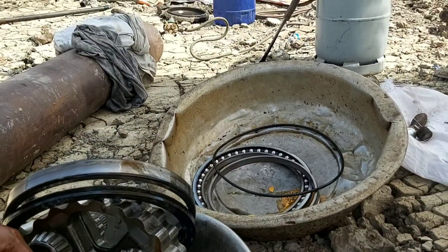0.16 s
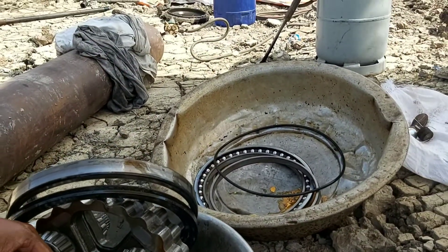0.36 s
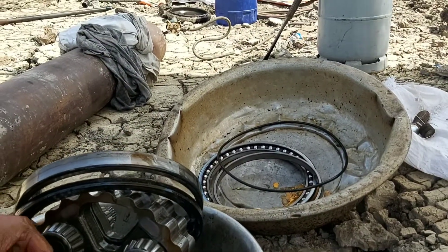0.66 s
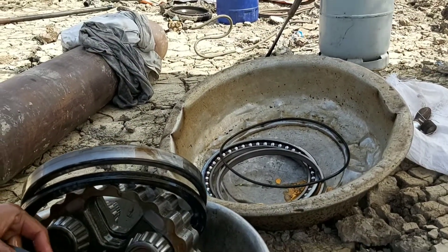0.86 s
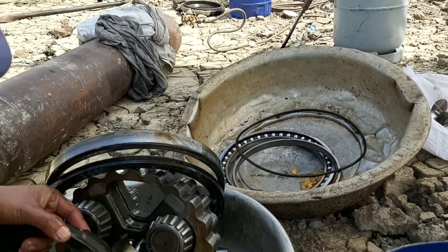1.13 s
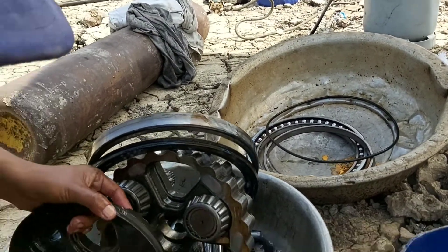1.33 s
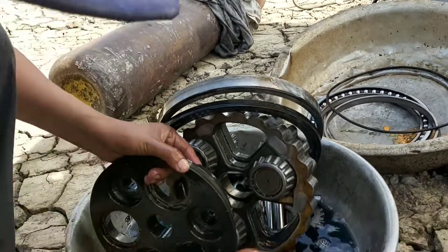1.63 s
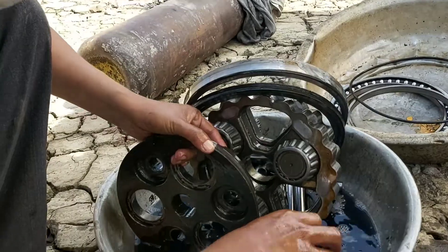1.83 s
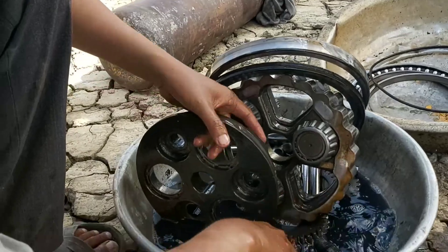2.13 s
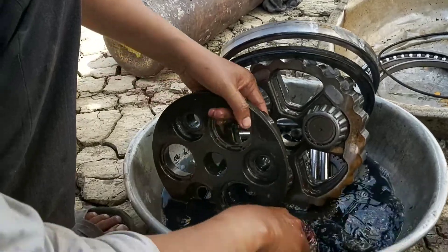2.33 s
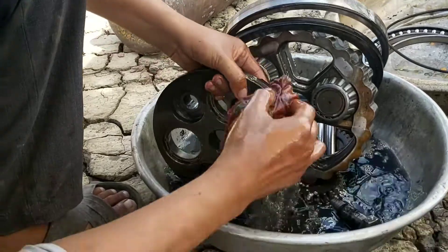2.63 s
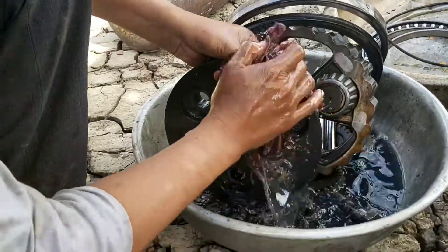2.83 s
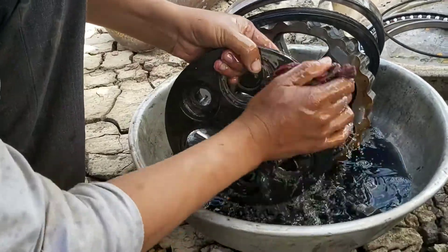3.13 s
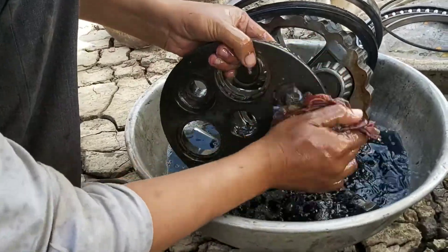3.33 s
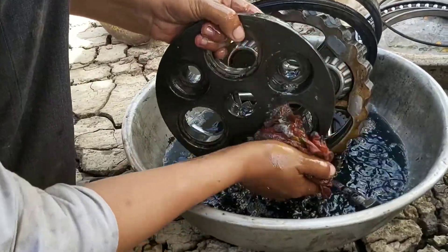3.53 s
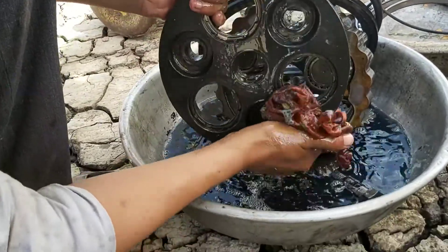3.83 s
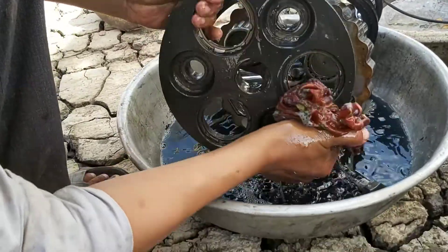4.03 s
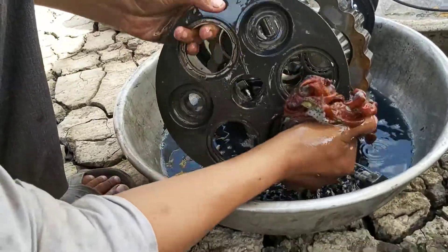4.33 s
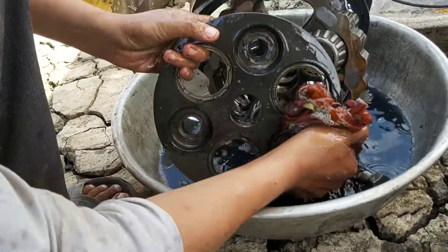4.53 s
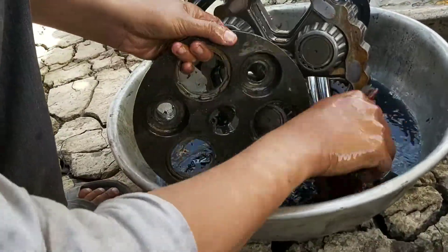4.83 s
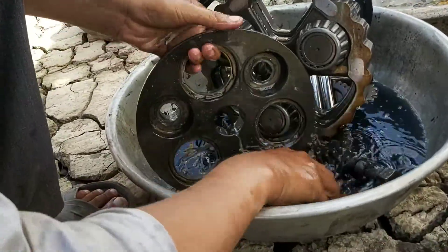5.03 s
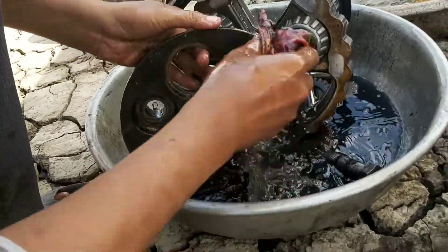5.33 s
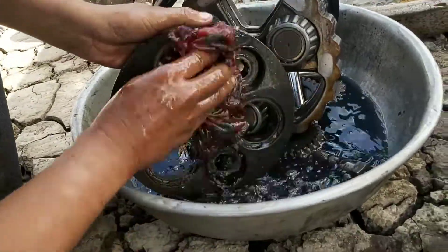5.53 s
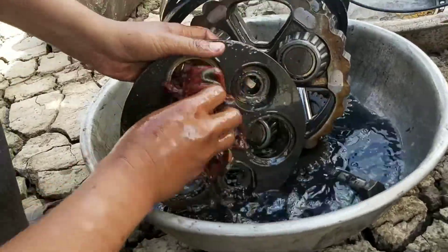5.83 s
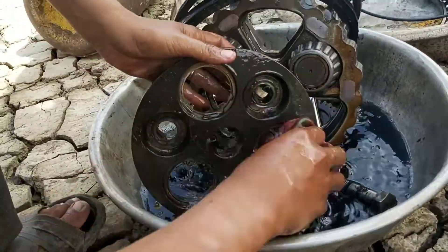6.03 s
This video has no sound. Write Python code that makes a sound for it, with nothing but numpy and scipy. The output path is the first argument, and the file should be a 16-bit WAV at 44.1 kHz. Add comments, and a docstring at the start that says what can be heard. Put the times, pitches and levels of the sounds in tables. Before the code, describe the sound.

A heavy steel gear plate knocks, scrapes and rings in a metal basin while oily liquid sloshes, bubbles and drips, with sharp handling clicks outdoors.

```python
"""A heavy steel gear plate is shifted about in a metal basin of washing oil, outdoors, and wiped with a soaked rag.
It scrapes, knocks and chatters: clusters of tiny contacts and hard blows drive steel modes and the damped basin.
Liquid sloshes, trickles and bubbles: droplet impulses and rising sines, swelling band by band.
A hand-held phone adds sharp case clicks (short modes), low bumps and grip rumble over a quiet yard of soft noise."""
import sys
import numpy as np
from scipy import signal
from scipy.fft import rfft, irfft, next_fast_len
from scipy.io import wavfile
from scipy.ndimage import uniform_filter1d

SR = 44100
rng = np.random.default_rng(int(sys.argv[2]) if len(sys.argv) > 2 else 0)


def generate_wav(signal):
    """Clip the signal to [-1, 1] and save it as 16-bit WAV at the path in sys.argv[1]."""
    frames = np.transpose(np.atleast_2d(signal))
    scaled = np.clip(frames, -1, 1) * 32767
    pcm = np.round(scaled).astype(np.int16)
    wavfile.write(sys.argv[1], SR, pcm)


N = 271656
TIME = np.arange(N) / SR
AGE = TIME[:SR // 2]  # time since a blow

# response of the liquid-damped basin: (frequency [Hz], level [dB])
BASIN_RESPONSE = [(47, -49), (80, -20), (163, -24.5), (289, -6.5), (588, 0), (839, -9.5), (917, -8),
                  (1340, -12), (1600, -8), (2430, -15), (3240, -15.5), (5640, -21.5), (6450, -23),
                  (12500, -27.5), (16000, -42)]
# heavy drops of the plate: (time [s], level [dB], treble [dB], ring [dB], pitch favoured by the struck spot [Hz],
# delay of the first bounce [s], boom relative to the drop [dB]); level and ring are shifted in the mix
PLATE_DROPS = [(.993, -17, -4.5, 6.5, 990, .014, -9), (1.9466, -12.5, -1.5, -4, 1240, .022, -2),
               (4.763, -13, 2.5, -2, 704, .032, -10)]


def undb(db):
    """Decibels to gain."""
    return 10 ** (np.asarray(db) / 20)


def fade(t60):
    """Exponential decay after a blow, 60 dB in t60 seconds."""
    return np.exp(-np.log(1000) * AGE / max(t60, 1e-3))


def unit(x):
    """Scale to rms 1."""
    return x / np.sqrt(np.mean(x ** 2))


def crest(x, size=256):
    """Scale a stereo burst so that its loudest few milliseconds have rms 1."""
    power = uniform_filter1d(np.mean(x ** 2, axis=0), size)
    return x / np.sqrt(power.max())


def add(out, s, x):
    """Mix a sound in at a given time."""
    i = int(np.clip(s * SR, 0, N - 1))
    out[..., i:i + x.shape[-1]] += x[..., :N - i]


def low(x, hz, order=2):
    """Low-pass filter."""
    return signal.sosfilt(signal.butter(order, min(hz, SR / 2 - 1), fs=SR, output="sos"), x)


def brighten(x, db, hz):
    """Treble shelf."""
    bass = low(x, hz, order=1)
    return bass + undb(db) * (x - bass)


def colour(x, points):
    """Causal minimum-phase filter with the given (frequency [Hz], level [dB]) response."""
    size = next_fast_len(x.shape[-1] // 2 + 2048) * 2
    hz, db = np.transpose(points)
    bins_hz = np.arange(size // 2 + 1) * SR / size
    gain = undb(np.interp(np.log(bins_hz + 1), np.log(hz), db))
    # fold the cepstrum forward in time so that nothing sounds early
    cepstrum = irfft(np.log(gain)) * (1 + np.sign(size // 2 - np.arange(size)))
    cepstrum[0] /= 2
    return irfft(rfft(x, size) * np.exp(rfft(cepstrum)))[..., :x.shape[-1]]


def spread(pair, hz):
    """Two unrelated signals to left and right: alike below hz, unrelated above."""
    side = signal.sosfilt(signal.butter(2, hz, "high", fs=SR, output="sos"), pair[1])
    return np.array([pair[0] + side, pair[0] - side])


def ticks(size, rate, scatter_db):
    """Randomly timed impulses, rate a second, of scattered strength."""
    chance, strength = rng.random(size), rng.standard_normal(size)
    sign = rng.choice([-1, 1], size)
    return (chance < rate / SR) * sign * undb(scatter_db * np.clip(strength, -2, 2))


def grit(rate, scatter_db):
    """Two unrelated streams of tiny contacts."""
    return unit(np.array([ticks(N, rate, scatter_db), ticks(N, rate, scatter_db)]))


def wander(rate):
    """Random levels, rate a second, joined by straight lines."""
    return np.interp(TIME * rate, np.arange(len(AGE)), rng.standard_normal(len(AGE)))


def swell(s, hold, rise, t60):
    """Gain that swells by 60 dB to 1 at a given time, holds, and dies away."""
    before = np.maximum(s - TIME, 0) / max(rise, 1e-3)
    after = np.maximum(TIME - s - hold, 0) / max(t60, 1e-3)
    return np.exp(-np.log(1000) * np.minimum(before + after, 10))


def ring(modes, stretch, apart_hz):
    """Struck modes; the higher ones reach the two microphones further out of step."""
    out = 0
    for hz, db, t60 in modes:
        lag = np.array([[-1], [1]]) * min(hz / apart_hz, 1.8) / 2
        wave = np.sin(2 * np.pi * (hz * AGE + rng.random()) + lag)
        out = out + undb(db) * fade(t60 * stretch) * wave
    return out


def scrape():
    """Stick-slip contacts come in uneven clusters and drive the basin and the plate's edge."""
    # resonances that the dragging edge brings out: (frequency [Hz], level [dB], t60 [s])
    edge_modes = [(593, -2.5, 0.037), (1106, 1, 0.014), (1410, 3, 0.0051), (1840, -21, 0.11),
                  (2640, -12, 0.032), (3950, -13, 0.027)]
    # drags of the plate: (time of the hardest push [s], level before a common cut [dB], treble [dB], build-up [s])
    drags = [(.01, -33, -12, 0.24), (0.259, -52, -2, .3), (.51, -45.5, 1, .1), (.8, -44.5, -24, 0.44),
             (0.901, -32.5, -17, 0.26), (0.984, -35, 15, 0.2), (1.445, -41, -16, 0.39),
             (1.63, -58, -12, 0.22), (1.79, -62.5, -15, 0.9), (4.62, -47.5, -26, 0.54),
             (4.771, -16, -1.5, 0.072), (4.88, -36, 4, 0.17)]
    stop_s = .47  # t60 as the plate comes to rest
    slips = grit(5000, 3.5) * undb(1.8 * wander(130))
    edge = signal.fftconvolve(ring(edge_modes, 1, 1400), slips[:1])[:, :N]
    body = colour(spread(slips, 1100), BASIN_RESPONSE)
    # light contacts hardly move the low modes
    light_body = body - low(body, 500, order=1)
    rub = unit(light_body) + undb(2.0) * unit(edge)
    out = 0
    for s, db, treble_db, rise in drags:
        out = out + brighten(rub, treble_db, 2400) * undb(db - 5.5) * swell(s, 0, rise, stop_s)
    return out


def bubble(hz, t60, rise):
    """A decaying sine; a positive rise lifts its pitch, as when a bubble nears the surface."""
    t = AGE[:int(t60 * SR) + 2]
    wave = np.sin(2 * np.pi * hz * t * (1 + rise * t / t60 / 2))
    decay = np.exp(-np.log(1000) * t / t60)
    onset = 1 - np.exp(-t * hz)
    return wave * decay * onset


def froth(count, cycles):
    """A crowd of small bubbles, damped by the oil, each at its own place in the basin."""
    out = np.zeros((2, N))
    for when, pitch, size, life, place in rng.random((count, 5)):
        hz = 430 * 19 ** pitch
        strength = np.sqrt(hz) / (size + .04) ** .4
        pop = bubble(hz, cycles * (.5 + life) / hz, .12) * strength
        s = when * N / SR
        add(out[0], s, pop)
        add(out[1], s + (place - .5) * 0.00064, pop)
    return out


def gurgle(x, depth_db, rate):
    """Pockets of air open and close, so each half octave swells on its own."""
    size = next_fast_len(N)
    spectrum = rfft(x, size)
    octave = np.log2(np.maximum(np.linspace(0, SR / 2, spectrum.shape[-1]), 250) / 250)
    out = 0
    for band in range(14):
        part = irfft(spectrum * np.maximum(1 - abs(2 * octave - band), 0), size)[:, :N]
        # the fine spray on top is steadier than the pockets below
        depth = depth_db / (1 + (band / 10) ** 4)
        out = out + part * undb(depth * wander(rate))
    return out


def liquid():
    """Sloshing and splashes stir up clumps of bubbles and droplets, the spray apart from the body."""
    # tone of the liquid: (frequency [Hz], level [dB])
    liquid_tone = [(150, -43.5), (250, -4), (348, -4.5), (723, -4.5), (955, -9.5), (1240, -2.5),
                   (2360, -1.5), (6700, -12), (8260, -10), (14700, -18), (16000, -52)]
    # stirrings: (time [s], length [s], level before the lapping [dB], spray relative to the body [dB])
    stirs = [(0, 0.063, -45.5, -3), (2.06, 0.046, -65.5, 9.5), (2.239, 0.051, -42, 0.5),
             (2.437, 0.31, -44.5, -6.5), (2.737, 0.41, -45.5, 1.5), (3.21, 0.49, -67, 11),
             (3.352, 0.2, -44.5, -5.5), (3.9, .4, -63.5, 10.5), (4.47, 0.25, -68.5, 10),
             (4.797, 0.083, -28.5, -12), (5.045, 0.0097, -40, 2), (5.168, 0.12, -43, -6),
             (5.375, 0.27, -42.5, -2.5), (5.825, 0.24, -47, -6)]
    # splashes and squeezes of the rag: (time [s], level before a common cut [dB], treble [dB])
    splashes = [(2.162, -31, -16), (2.2201, -18.5, -28), (2.2576, -27, 14.5), (2.33, -27.5, 8.5),
                (2.367, -51, 15), (2.437, -29.5, 18.5), (2.4962, -30, 2.5), (2.514, -25, -11),
                (2.7693, -32, 12), (2.809, -36, 19.5), (2.871, -26, -7), (2.891, -29, 8.5),
                (2.9314, -24, 1), (2.996, -33.5, 15.5), (3.09, -44.5, 23), (3.153, -36, 14),
                (3.2644, -43.5, 19.5), (4.473, -61.5, 24), (5.218, -34, 8.5), (5.608, -29, -5),
                (5.669, -32, 0), (5.775, -22, -9), (5.892, -26.5, 3), (5.994, -22.5, -24),
                (6.0874, -27.5, -4)]
    rise_s, settle_s, splash_t60_s = 0.22, 0.77, 0.052  # 60 dB up, 60 dB down
    froth_db, pocket_db = -7.5, 5.5  # bubbles against droplets; depth of the gurgling
    lapping = undb(3.43 * wander(90) + 1.64 * wander(18))
    splash, spray = np.zeros((2, N))
    for s, length, db, spray_db in stirs:
        flow = undb(db) * swell(s, length, rise_s, settle_s) * lapping
        splash = splash + flow
        spray = spray + flow * undb(spray_db)
    for s, db, treble_db in splashes:
        burst = undb(db - 6) * fade(splash_t60_s) * (1 - fade(0.019))
        add(splash, s, burst)
        add(spray, s, burst * undb(treble_db))
    droplets = unit(spread(grit(6000, 3.5), 1500))
    bubbles = unit(froth(count=7500, cycles=21))
    wet = gurgle(droplets + undb(froth_db) * bubbles, depth_db=pocket_db, rate=45)
    wet = unit(colour(wet, liquid_tone))
    body = low(wet, 2970, order=1)
    return body * splash + (wet - body) * spray


def grip():
    """The hand rumbles on the phone as it holds on and shifts: low noise, swelling at each shift."""
    # tone of the rumble: (frequency [Hz], level [dB])
    grip_tone = [(15, -46), (25, -37), (51, -5), (103, -1), (167, -11), (205, -15.5), (258, -18),
                 (329, -10.5), (450, -43.5), (580, -14.5), (990, -120)]
    # shifts of the grip: (time [s], length [s], level [dB])
    shifts = [(0.023, 0.024, -29), (0.238, .01, -43.5), (1.015, 0.0091, -67), (1.185, .01, -57),
              (1.586, .005, -49), (1.702, 0.0041, -35.5), (1.966, 0.024, -41), (2.126, 0.0042, -46),
              (2.343, .01, -47), (2.812, 0.082, -45.5), (3.146, 0.29, -49), (3.513, 0.17, -39),
              (3.864, 0.1, -35.5), (4.202, 0.011, -41), (4.748, 0.018, -40), (5.102, 0.021, -24),
              (5.493, 0.027, -45.5), (5.86, 0.037, -46)]
    rise_s, relax_s = 0.16, 0.37  # 60 dB up, 60 dB down
    hold_db, waver_db = -59, 4.5  # the hand that merely holds on
    rumble = colour(spread(rng.standard_normal((2, N)), 73), grip_tone)
    rumble = unit(low(rumble, 462, order=4))
    effort = sum(undb(db) * swell(s, length, rise_s, relax_s) for s, length, db in shifts)
    return rumble * (effort + undb(hold_db + waver_db * wander(7.3)))


def yard():
    """Faint outdoor background: coloured noise that swells slowly."""
    # tone of the yard: (frequency [Hz], level [dB])
    yard_tone = [(15, -55), (25, -7), (120, -16.5), (229, -6.5), (373, 7.5), (641, -11.5), (796, -9.5),
                 (1520, -37), (1740, -1), (2000, -25), (3160, -19), (6920, -28.5), (8140, -20),
                 (12500, -28.5), (16000, -28)]
    level_db = -54.5 + wander(6.2)
    return unit(colour(spread(rng.standard_normal((2, N)), 280), yard_tone)) * undb(level_db)


def basin(t60):
    """Dense, quickly damped response of the filled basin."""
    return colour(spread(rng.standard_normal((2, len(AGE))) * fade(t60), 1300), BASIN_RESPONSE)


def blows():
    """Every blow of the plate: knocks, and drops with two quieter, duller bounces, the second sooner."""
    # lighter knocks: (time [s], level [dB], treble [dB], chatter t60 [s], ring [dB],
    # pitch favoured by the struck spot [Hz]); level and ring are shifted in the mix
    light_knocks = [(.009, -28, -5.5, 0.079, -7.5, 540), (.053, -31, -19, .024, -1, 910),
                    (.128, -36, -17, 0.1, 2, 1230), (.154, -43, 1, 0.13, -17, 880),
                    (.436, -50, -8, 0.025, 5, 563), (.451, -34, -9, 0.15, 3, 910),
                    (.460, -29, -10, .14, -5, 900), (.738, -51, -21, 0.039, 9.5, 550),
                    (.768, -38.5, -24, 0.031, -2, 600), (.913, -33.5, -11, 0.11, 5.5, 795),
                    (.945, -26, -24, 0.11, 6, 2000), (1.089, -45, 8, 0.056, -13, 2500),
                    (1.108, -48, 19, 0.077, -15, 2500), (1.277, -58.5, 10.5, .07, -32, 2500),
                    (1.428, -42.5, 6.5, 0.093, 0.5, 900), (1.549, -34, -26, 0.063, -8, 1700),
                    (1.927, -27, -5, 0.15, -2, 1400), (4.735, -33.5, 11, .26, -14, 900),
                    (4.748, -15, 5, 0.073, -4, 900), (4.786, -21.5, 12.5, 0.078, 6.5, 910),
                    (4.852, -23.5, 1, 0.12, -3, 600), (4.876, -20.5, -13, 0.094, 0, 1000),
                    (4.939, -30, 13.5, 0.052, -4, 600), (4.958, -26, 0.5, 0.093, -9, 900)]
    bounce_db, bounce_treble_db, bounce_ring_db = -7, -6.5, 1  # compared with the drop
    shrink = 0.68  # second flight compared with the first
    drop_chatter_s, bounce_chatter_s = .08, .11  # t60
    rows = list(light_knocks)
    for s, db, treble_db, ring_db, spot_hz, flight, _ in PLATE_DROPS:
        rows.append((s, db, treble_db, drop_chatter_s, ring_db, spot_hz))
        for after in (flight, flight * (1 + shrink)):
            rows.append((s + after, db + bounce_db, treble_db + bounce_treble_db,
                         bounce_chatter_s, ring_db + bounce_ring_db, spot_hz))
    return rows


def knocks():
    """Each blow is one hard contact and a dying chatter; the steel rings on, coloured by where it was struck."""
    # ringing of the steel before spot and freedom act: (frequency [Hz], level [dB], t60 [s])
    steel_modes = [(576, -9, 0.45), (630, 13.5, 0.095), (732, 0, 0.265), (788, 0.5, 0.16), (882, 6, 0.11),
                   (1037, -17, 0.056), (1043.5, 6.5, 0.17), (1114, 4, 0.12), (1436, 0, 0.21),
                   (1410, -12, 0.13), (1624, -6, 0.27), (1820, -5.5, 0.2), (2020, -14, 0.34),
                   (1980, -4, 0.25), (2380, -26, 1), (2720, -3, 0.057), (2980, -12, 0.29), (3850, 5.5, 0.1)]
    # how freely the plate rings, held or half sunk: (time [s], length of the ring [factor])
    freedom = [(1.1, 0.8), (1.9, 1.24), (2.1, 2.06), (4.7, 0.55)]
    out = np.zeros((2, N))
    for s, db, treble_db, t60, ring_db, spot_hz in blows():
        contact = ticks(len(AGE), 3500, 4.75) * fade(t60)
        contact[0] += 4.5  # the hard first contact
        thud = signal.fftconvolve(basin(0.014), contact[None])[:, :len(AGE)] * (1 - fade(0.0086))
        # the rim of the basin shivers on as a dense, faint tail
        thud = crest(thud) + undb(-25.0) * crest(low(basin(0.25), 2500))
        modes = [(hz, mode_db - 7 * abs(np.log2(hz / spot_hz)), life) for hz, mode_db, life in steel_modes]
        # the holes in the plate split each mode into a beating pair
        modes += [(hz * 1.017, mode_db - 4, life * .7) for hz, mode_db, life in modes]
        steel = ring(modes, np.interp(s, *np.transpose(freedom)), 2600)
        blow = thud + undb(ring_db - 15.0) * steel
        add(out, s, undb(db + 3.0) * brighten(blow, treble_db, 3000))
    return out


def crack():
    """Brief noise of a hard contact, with a faint tail from the ground."""
    noise = spread(rng.standard_normal((2, len(AGE))), 1200)
    return low(noise * (fade(0.014) + undb(-11.5) * fade(0.14)), 7000, order=1)


def clinks():
    """Light touches of steel: a short bright ring and a thin ping that outlasts it."""
    # touches of steel on steel: (time [s], level before a common lift [dB], ping relative to the touch [dB])
    touches = [(0.037, -21.5, -40), (1.412, -43, -20), (1.43, -53, 15), (1.474, -58, 20), (1.509, -21, -5)]
    # their modes, shortened a little below: (frequency [Hz], level [dB], t60 [s])
    touch_modes = [(584, -9.5, 0.043), (1730, 1, 0.064), (1940, -2.5, 0.018), (2650, -10, 0.045),
                   (3830, -1, 0.034), (4180, -6, 0.03), (4940, -10, 0.067), (5260, -12, 0.037)]
    ping_hz, ping_t60_s = 12270, 0.1  # the highest mode
    out = np.zeros((2, N))
    for s, db, ping_db in touches:
        touch = ring(touch_modes, 0.84, 1800) + undb(-12) * crack()
        touch = crest(touch * (1 - fade(0.0036)))
        ping = undb(ping_db) * ring([(ping_hz, 0, ping_t60_s)], 1, ping_hz)
        add(out, s, undb(db + 2.0) * (touch + ping))
    return out


def bumps():
    """Soft bumps of the hand on the phone: short low sines of steady pitch."""
    # bumps: (time [s], level before a common lift [dB], pitch [Hz])
    hand_bumps = [(0.089, -13.5, 76), (1.184, -35, 170), (1.332, -21.5, 85), (1.574, -30.5, 129),
                  (1.704, -32.5, 138), (2.128, -25.5, 176), (3.342, -18.5, 89), (3.566, -14.5, 111),
                  (3.936, -16, 95), (5.104, -11, 85), (5.12, -19.5, 200)]
    out = np.zeros((2, N))
    for s, db, hz in hand_bumps:
        bump = undb(db + 6.5) * bubble(hz, 0.028, 0)
        # the flex of the case reaches one microphone slightly later
        add(out[0], s, bump)
        add(out[1], s + 0.00045, bump)
    return out


def case_clicks():
    """The phone case snaps under the fingers: short modes with a tiny rattle and a crack."""
    # clicks: (time [s], level [dB], treble [dB], length of the ring [factor])
    clicks = [(.229, -39, -40, 1.4), (3.135, -26, -5, 1.1), (3.4987, -17, -3.5, 1.03),
              (3.8426, -19.5, 3.5, 0.92), (5.1162, -17, -8.5, 1.5), (5.477, -15.5, -4.5, 1.14),
              (5.849, -17, -5, 1.33)]
    # modes of the case before each press varies them: (frequency [Hz], level [dB], t60 [s])
    case_modes = [(1018, -28.5, 0.036), (1575, 3, 0.0088), (2180, -10.5, 0.023), (2714, 1, 0.011),
                  (2824, -6, 0.017), (3240, 1, 0.012), (3790, 4, 0.0081), (4345, -8, 0.021),
                  (6570, -34, 0.01), (8170, -5.5, 0.015), (9120, -12.5, 0.016), (11770, -14, 0.039),
                  (13060, -7.5, 0.03)]
    out = np.zeros((2, N))
    for s, db, treble_db, stretch in clicks:
        # each press loads the case a little differently
        modes = [(hz * (1 + .025 * rng.standard_normal()), mode_db, t60) for hz, mode_db, t60 in case_modes]
        snap = ring(modes, stretch, 1700) * (1 - fade(0.01))
        chatter = ticks(len(AGE), 3000, 2.4)[None] * fade(0.082)
        rattle = signal.fftconvolve(snap, chatter)[:, :len(AGE)]
        click = crest(snap) + undb(-13.5) * crest(rattle) + undb(-7.0) * crest(crack())
        add(out, s, undb(db) * crest(brighten(click, treble_db, 2300)))
    return out


def large_bubbles():
    """Large bubbles and drops stand out alone, each a short sine of rising pitch."""
    # bubbles and drops: (time [s], level [dB], starting pitch [Hz])
    lone_bubbles = [(.317, -27, 570), (2.201, -28.5, 637), (2.292, -32, 753), (2.404, -31, 660),
                    (2.421, -30, 613), (2.440, -23.5, 2300), (2.522, -28, 580), (2.543, -38, 516),
                    (2.69, -35, 590), (2.787, -32.5, 687), (3.957, -40.5, 3040), (4.106, -42.5, 11000),
                    (4.159, -40, 2450), (4.19, -38.5, 1360), (4.352, -43, 1760), (4.985, -23, 1200),
                    (5.013, -28, 1060), (5.518, -31, 1690), (5.781, -27, 1190)]
    out = np.zeros((2, N))
    for s, db, hz in lone_bubbles:
        add(out, s, undb(db) * bubble(hz, t60=0.043, rise=0.2))
    return out


def booms():
    """The weight of a drop makes the floor of the basin boom briefly."""
    # low modes of the basin floor, woken only by heavy drops: (frequency [Hz], level [dB], t60 [s], cut by 1 %)
    floor_modes = [(285, -6, 0.23), (310, 1.5, 0.09), (388, 3.5, 0.15), (414.5, -3.5, 0.17),
                   (628.5, 5, 0.16)]
    out = np.zeros((2, N))
    for s, db, *_, boom_db in PLATE_DROPS:
        boom = crest(ring(floor_modes, 0.99, 380) * (1 - fade(0.0049)))
        add(out, s, undb(db + boom_db) * boom)
    return out


def scene():
    """Steel, basin, liquid, the hand on the phone and the yard."""
    plate = scrape() + knocks() + clinks() + booms()
    oil = liquid() + large_bubbles()
    hand = grip() + bumps() + case_clicks()
    return plate + oil + hand + yard()


def record(dry):
    """The phone rounds the loudest peaks and cuts the top."""
    top_hz = 15450
    return signal.sosfilt(signal.ellip(8, .2, 70, top_hz, fs=SR, output="sos"), np.tanh(dry))


dry = scene()
out = record(dry)
generate_wav(out)
```